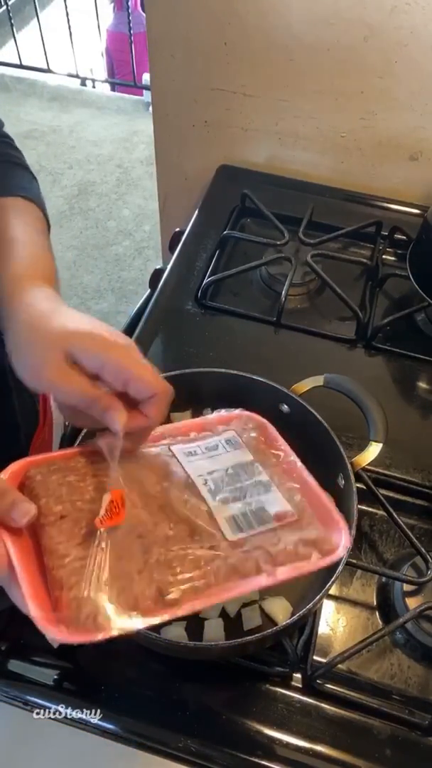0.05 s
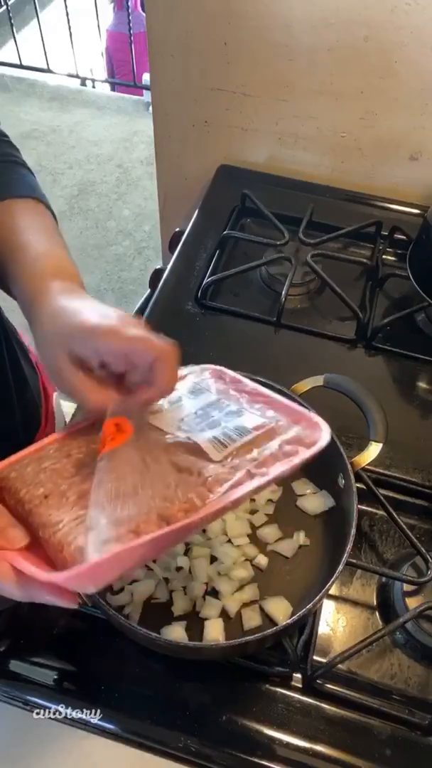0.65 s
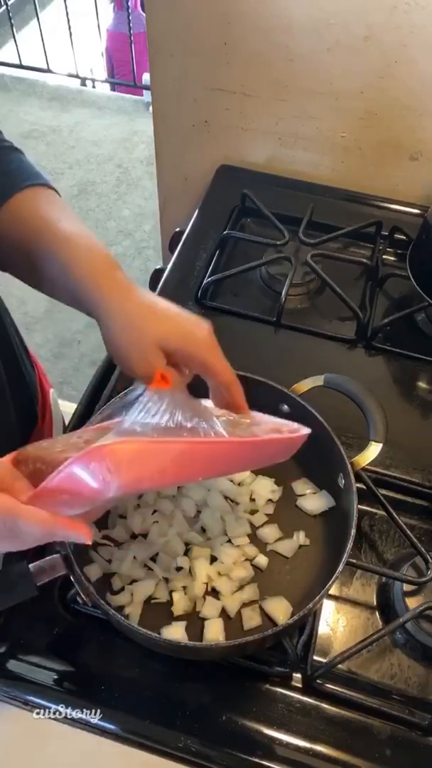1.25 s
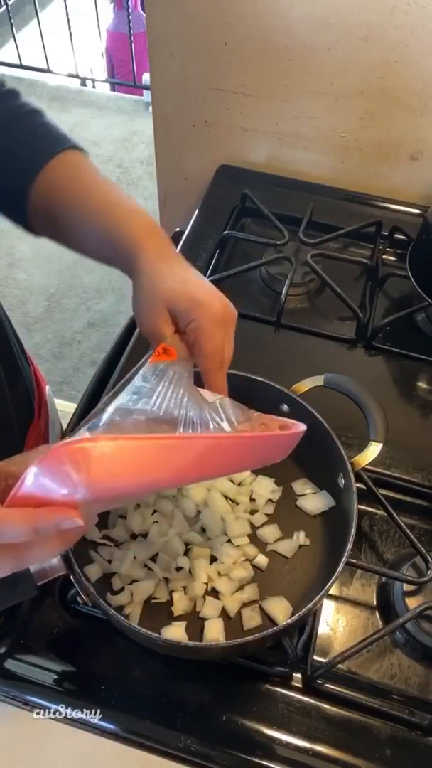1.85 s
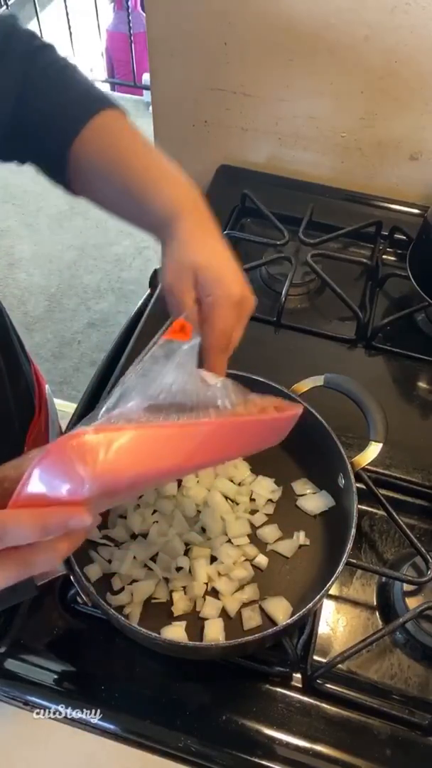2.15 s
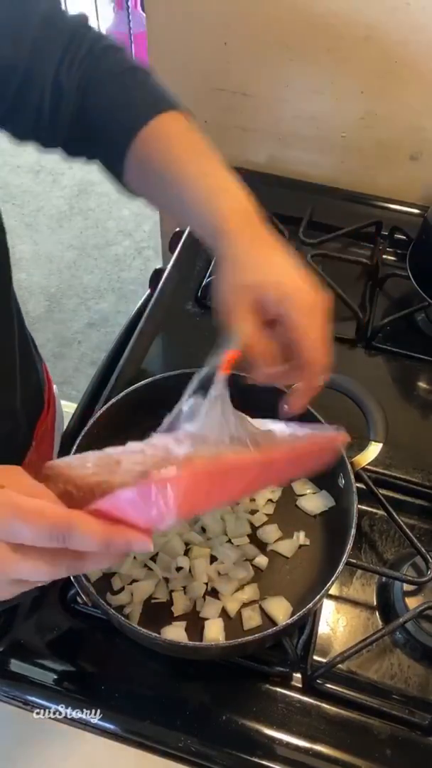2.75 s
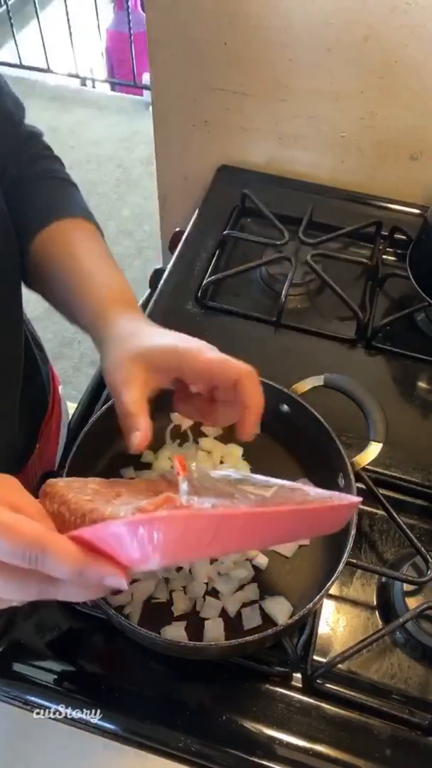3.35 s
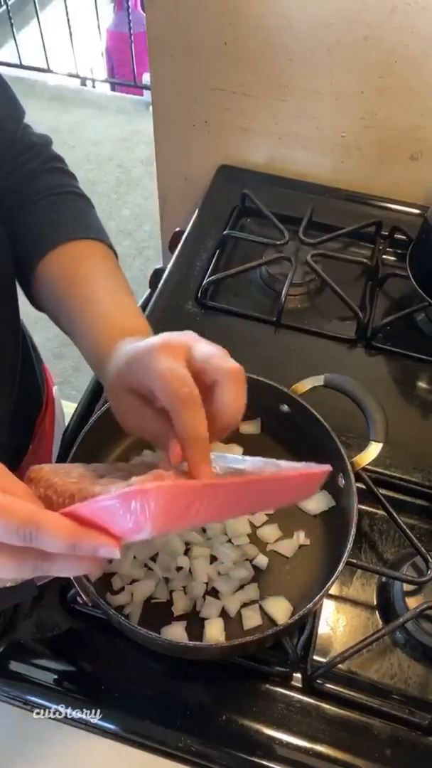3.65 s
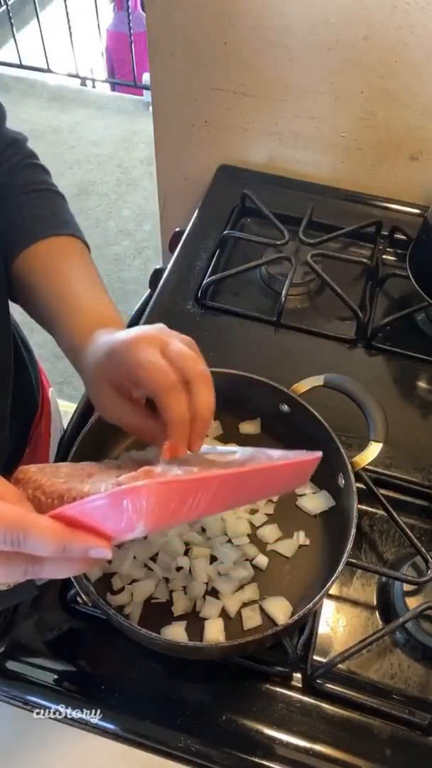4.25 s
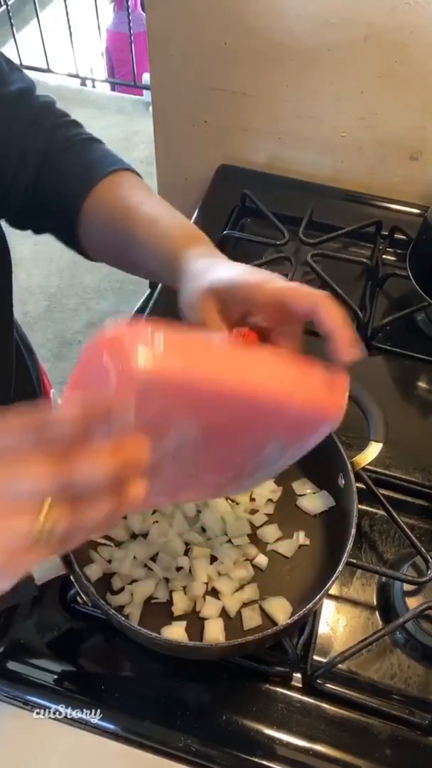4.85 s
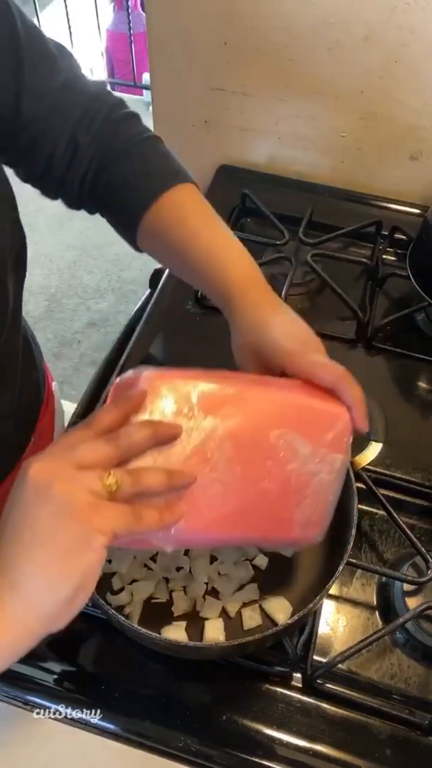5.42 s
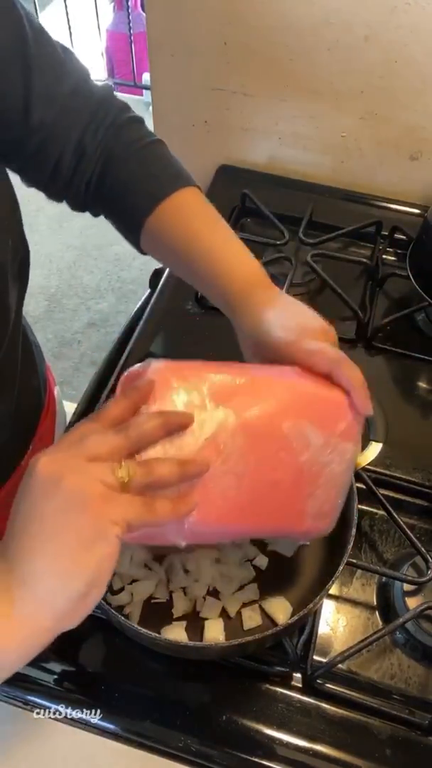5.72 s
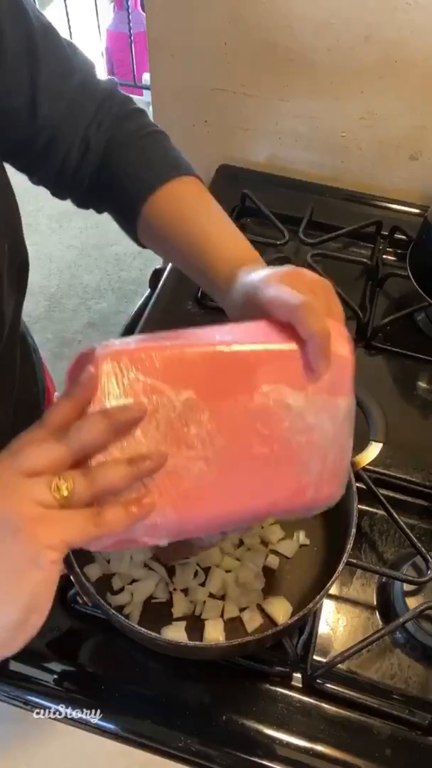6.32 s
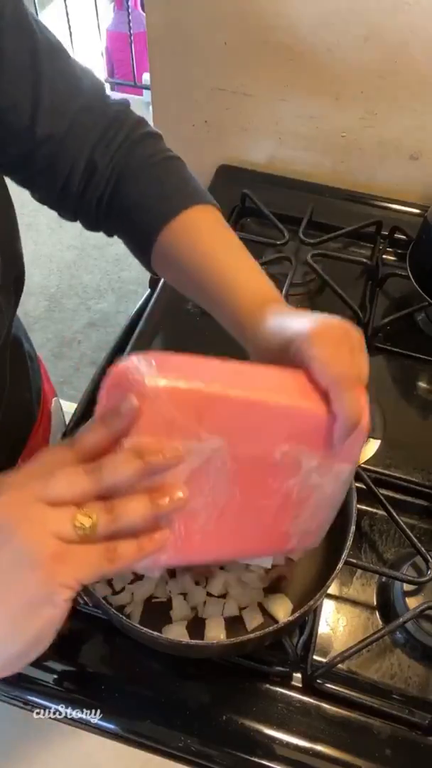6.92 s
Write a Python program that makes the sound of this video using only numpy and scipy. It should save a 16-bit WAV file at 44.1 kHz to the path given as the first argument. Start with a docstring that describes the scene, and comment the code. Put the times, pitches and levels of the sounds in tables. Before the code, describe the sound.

Diced onion sizzles in a pan while cling film snaps and rustles on a foam tray, then meat drops in and the sizzle swells.

```python
"""In a kitchen, diced onion sizzles in a pan on a gas stove, over the low hum of a motor.
The sizzle is thousands of tiny steam bubbles bursting; bigger drops of water pop in the oil.
Just above the pan, hands stretch and tear the cling film on a foam tray of minced meat:
the film snaps, rustles and squeaks, and fingers knock on the hollow tray.
The tray is turned over, the meat flops into the oil, and the sizzle swells and deepens."""
import sys
import numpy as np
from scipy import signal
from scipy.fft import rfft, irfft
from scipy.io import wavfile

SR = 44100
rng = np.random.default_rng(int(sys.argv[2]) if len(sys.argv) > 2 else 0)


def file_out(sig):
    """Save sig as 16-bit WAV at sys.argv[1]."""
    # one column per channel
    cols = np.atleast_2d(sig).T
    # limit, then scale
    lim = np.clip(cols, -1, 1)
    pcm = np.round(lim * 32767).astype(np.int16)
    wavfile.write(sys.argv[1], SR, pcm)


N = 316682
TIME = np.arange(N) / SR
HZ = np.fft.rfftfreq(4096, 1 / SR)  # the pitches at which every tone curve is given
GENTLE_DB = -34  # level of gentle frying

# pitches at which the air in the pan rings: pitch_hz, width_hz, boost_db
PAN_RESONANCES = [(1013, 86, 3), (1170, 92, 8.5), (1292, 82, 7.5), (1780, 470, 4.5), (2304, 195, 4.5),
                  (2850, 420, 3), (3510, 210, 1), (4300, 510, -1.5), (5630, 160, -0.5), (6400, 150, 0),
                  (7500, 130, 1.5), (8330, 250, 1)]


def sizzle(bubbling_offset_db=-10, bubbling_growth=0.055):
    """Bursting bubbles make fine fizz and coarser bubbling; the louder, the more they blur into hiss."""
    # tone of the fine fizz: pitch_hz, gain_db
    fizz_tone = [(200, -49), (900, -18), (2000, -9.5), (4000, -7.5), (6000, 1.5), (7500, 2.5), (9200, 4),
                 (9900, 1), (12300, 2.5), (14000, -3), (16000, -9.5)]
    # tone of the coarse bubbling: pitch_hz, gain_db
    bubbling_tone = [(100, -2), (300, -8), (800, -4.5), (1200, -5.5), (2500, -7), (3300, -2), (4400, 2),
                     (6000, -4.5), (10000, -20), (16000, -26)]
    fizz_db = frying_db()
    # the bubbling gains on the fizz as the frying grows, so the sound deepens
    bubbling_db = fizz_db + bubbling_offset_db + bubbling_growth * (fizz_db - GENTLE_DB)
    hiss_share = np.clip(0.47 + 0.016 * (fizz_db - GENTLE_DB), 0, 0.95)
    fine = bubbles(per_s=3000, spread_db=2.5, fade_s=0.043, direct=0.86, spots=16)
    fine = np.sqrt(1 - hiss_share) * fine + np.sqrt(hiss_share) * rng.standard_normal(N)
    coarse = bubbles(per_s=1200, spread_db=3.5, fade_s=0.029, direct=0.96, spots=12)
    coarse = np.sqrt(1 - hiss_share) * coarse + np.sqrt(hiss_share) * rng.standard_normal(N)
    surge = (1 - hiss_share) * drift(per_s=32)  # gentle frying comes in small waves
    pan_db = body_tone(PAN_RESONANCES)
    fizz = colour(fine * gain_of(fizz_db + 1.2 * surge), curve(fizz_tone) + pan_db)
    bubbling = colour(coarse * gain_of(bubbling_db + 0.72 * surge), curve(bubbling_tone) + pan_db)
    return fizz + bubbling


def bubbles(per_s, spread_db, fade_s, direct, spots):
    """Tiny steam bubbles burst at several spots in the pan, each spot with its own echoes."""
    bursts = [signal.oaconvolve(clicks(N, per_s / spots, spread_db), echoing_click(fade_s, direct))[:N]
              for _ in range(spots)]
    return unit_level(sum(bursts))


def frying_db():
    """Level over time of the onion and the meat frying together."""
    # the onion frying on its own: time_s, level_db
    onion_levels = [(0, -35), (1.3, -35), (1.68, -37.5), (2.0, -34), (2.85, -37), (3.1, -36.5),
                    (3.35, -35.5), (3.8, -37.5), (4.25, -38), (4.75, -35), (5.08, -38.5)]
    onion = gain_of(np.interp(TIME, *np.transpose(onion_levels)))
    return 20 * np.log10(np.hypot(onion, meat_flares()))


def meat_flares(trim_db=-0.27):
    """Strength of the frying meat over time: each touch of the oil swells, then settles."""
    # juice, then the edge, then the bulk of the meat meet the oil:
    # start_s, peak_s, level_db (before the trim), fade_s (time to fall by 60 dB)
    touches = [(5.14, 5.96, -30.8, 10), (6.43, 6.61, -29.4, 1.8), (6.74, 6.86, -27.1, 25)]
    swells = [gain_of(db + trim_db) * envelope(TIME - start, peak - start, peak - start, fade_s)
              for start, peak, db, fade_s in touches]
    return np.sqrt(np.sum(np.square(swells), axis=0))


def boil(offset_db=-9, power=2.34, lead_s=0.054, width_hz=300):
    """Water boils out of the meat as it heats, hissing in the pan just ahead of each flare."""
    # pitches at which the steam rings: pitch_hz, gain_db
    steam_peaks = [(1270, -2), (2330, -1.5), (2890, -5.5), (3330, 1.5), (4250, 0), (4480, -9), (5680, -9)]
    meat = np.interp(TIME + lead_s, TIME, meat_flares())
    strength = gain_of(offset_db) * meat.max() * (meat / meat.max()) ** power
    steam = strength * rng.standard_normal(N)
    ringing = sum(gain_of(db) / (1 + ((HZ - hz) / (width_hz / 2)) ** 2) for hz, db in steam_peaks)
    return colour(steam, 20 * np.log10(ringing))


def ticks(sharp_boost_db=6, droplets_db=-45.8, droplets_growth=0.5):
    """Sharp ticks stand out over the faint ticking of flying droplets, which grows with the frying."""
    # drops popping in the oil and a few crackles of the film: start_s, level_db (before the boost)
    sharp_ticks = [(0.0194, -16.5), (0.14, -10.5), (0.64, -20), (0.655, -11.5), (0.8403, -19), (1.077, -12),
                   (1.19, -11.5), (1.278, -16), (1.3125, -9.5), (1.372, -10.5), (1.454, -25), (1.6344, -20),
                   (1.867, -17), (1.929, -16), (2.593, -16.5), (2.79, -12.5), (3.028, -15.5),
                   (4.5835, -14.5), (4.7846, -14), (4.904, -16.5), (5.1202, -17), (5.9035, -13),
                   (5.9678, -9.5), (6.3373, -8.5), (6.6022, -9)]
    # tone of all the ticks: pitch_hz, gain_db
    tick_tone = [(300, -11), (1200, -13.5), (3000, -3.5), (6000, 2), (9000, 7.5), (12500, -2.5),
                 (16000, -18)]
    droplets = bubbles(per_s=40, spread_db=1.5, fade_s=0.048, direct=1.1, spots=4)
    out = gain_of(droplets_db + droplets_growth * (frying_db() - GENTLE_DB)) * droplets
    for start, db in sharp_ticks:
        add(out, start, gain_of(db + sharp_boost_db) * echoing_click(fade_s=0.04, direct=0.7))
    return colour(out, curve(tick_tone) + body_tone(PAN_RESONANCES))


def film_snaps(boost_db=21):
    """Tight film gives way with a crack that bounces off the tray, jolts it and shakes the loose film."""
    # the cracks: start_s, level_db (before the boost), pitch_hz, steepness (1 bright crack, 2 dull pluck)
    snaps = [(0.169, -35, 3500, 1.3), (.800, -26.5, 2800, 1.2), (1.045, -29.5, 1400, 2.1),
             (1.0861, -35, 1150, 2), (1.247, -34, 1500, 0.6), (1.372, -32.5, 1800, 1.4),
             (1.397, -37.5, 1400, 1.0), (1.514, -31.5, 1900, 2.1), (1.633, -37.5, 2200, 0.69),
             (1.8157, -23.5, 3480, 0.97), (2.2401, -13, 4430, 1.16), (4.64, -31, 2200, 0.81),
             (4.923, -30, 2500, 0.7), (5.18, -37.5, 2300, 1.6)]
    light_db, light_fade_s, doubling_db = -37, 0.028, 38  # tighter film snaps louder and rings longer
    bounce_s, bounce_db, jolt_db, jolt_hz = 0.00075, -8, -9, 650
    shiver_db, shiver_hz = -24, 342
    out = np.zeros(N)
    for start, db, hz, steep in snaps:
        fade_s = light_fade_s * 2 ** ((db - light_db) / doubling_db)
        crack = colour(echoing_click(fade_s, direct=0.45), hump(hz, 0.86, steep) + tray_tone())
        jolt_tone = hump(jolt_hz, narrow=0.9, steep=0.9) + tray_tone()
        jolt = colour(echoing_click(fade_s=0.034, direct=0.32), jolt_tone)
        strength = gain_of(db + boost_db)
        add(out, start, strength * crack)
        add(out, start + bounce_s, strength * (gain_of(bounce_db) * crack + gain_of(jolt_db) * jolt))
    shivers = [(start, 0.01, db + shiver_db, shiver_hz) for start, db, *_ in snaps]
    return out + rubs(shivers, tray_tone(), rise_s=0.011, fade_s=0.28,
                      narrow=0.25, steep=1.27, per_s=900, spread_db=1.5)


def film_rustles():
    """The film is dragged and crumpled against the tray."""
    # each drag: start_s, hold_s, level_db, pitch_hz
    drags = [(.13, 0.02, -43, 503), (.322, 0.019, -39, 746), (.455, 0.032, -34, 1610),
             (.585, 0.25, -40, 785), (.812, 0.036, -37.5, 1710), (1.04, 0.067, -42.5, 1150),
             (1.17, 0.12, -49, 850), (1.48, 0.0089, -47.5, 480), (1.768, 0.011, -45.5, 420),
             (1.825, 0.1, -46.5, 580), (2.24, 0.014, -46.5, 360), (2.335, 0.037, -48, 420),
             (2.69, 0.012, -42.5, 1550), (3.172, 0.048, -37, 555), (3.354, 0.011, -32, 3200),
             (4.31, 0.038, -50.5, 420), (4.63, 0.018, -46, 504), (4.742, 0.014, -41, 614),
             (4.84, 0.11, -47, 1100)]
    return rubs(drags, tray_tone(), rise_s=0.0082, fade_s=0.27,
                narrow=0.81, steep=0.64, per_s=1700, spread_db=0)


def film_squeaks(rise_s=0.0021, fade_s=0.07, width_hz=600):
    """The film sticks and slips over fingers and foam; its pitch slides as its tension changes."""
    # each squeak: start_s, hold_s, level_db, start_hz, end_hz
    squeaks = [(.815, .025, -42, 2100, 1800), (1.05, .062, -40.5, 1150, 1130),
               (1.195, .08, -46, 1130, 1200), (3.163, .04, -38.5, 1000, 850), (3.358, .02, -39, 1700, 2200),
               (3.542, .04, -47.5, 1000, 1550), (5.528, .007, -40.5, 1900, 2350),
               (5.831, .004, -42, 1400, 1650), (6.512, .012, -35.5, 2130, 2180)]
    out, t = np.zeros(N), np.arange(16000) / SR
    lowpass = signal.butter(2, width_hz / 2, fs=SR, output="sos")
    for start, hold, db, start_hz, end_hz in squeaks:
        pitch_hz = np.interp(t, [0, hold], [start_hz, end_hz])
        tone = np.exp(2j * np.pi * np.cumsum(pitch_hz) / SR)
        # keep only the band of noise around the sliding pitch
        slips = (signal.sosfilt(lowpass, rng.standard_normal(len(t)) / tone) * tone).real
        add(out, start, gain_of(db) * envelope(t, rise_s, hold, fade_s) * unit_level(slips))
    return out


def finger_knocks(narrow=1.1, contact_s=0.0005):
    """A finger knocks on the tray and rings mostly the notes near the pitch of the blow."""
    # each knock: start_s, peak_db, pitch_hz (low for a soft fingertip, high for a nail)
    knocks = [(0.133, -31, 300), (.326, -30, 700), (0.4469, -23.5, 520), (1.817, -22.5, 620),
              (4.9243, -24.5, 1250), (4.9992, -27.5, 1350), (5.21, -22.5, 900), (6.517, -23.5, 1090)]
    # the tray's own notes: pitch_hz, gain_db, fade_s
    tray_notes = [(440, -2, 0.032), (1054, 2.5, 0.012), (1285, -2, 0.036), (1840, -5, 0.014),
                  (2560, 12, 0.0065)]
    out, t = np.zeros(N), np.arange(6000) / SR
    for start, db, blow_hz in knocks:
        ring = np.zeros(len(t))
        for k, (hz, note_db, fade_s) in enumerate(tray_notes):
            note = gain_of(note_db - 60 * t / fade_s) * np.sin(2 * np.pi * hz * t)
            mismatch = np.hypot(1, narrow * (hz / blow_hz - blow_hz / hz))
            ring += (-1) ** k * note / mismatch
        ring *= 1 - np.exp(-t / contact_s)  # the fingertip sinks into the foam
        add(out, start, gain_of(db) * ring / abs(ring).max())
    return out


def tray_tone(bass_cut_hz=300):
    """Tone curve in dB of the light foam tray, which rings hollow and gives off little bass."""
    # pitches at which the tray rings: pitch_hz, width_hz, boost_db
    resonances = [(347, 60, 3.5), (436, 126, 5.5), (600, 60, 3), (800, 88, 1.5), (985, 35, 5),
                  (1290, 50, 4.5), (1920, 290, 3.5), (3930, 870, 1)]
    return body_tone(resonances) - 10 * np.log10(1 + (bass_cut_hz / (HZ + 10)) ** 4)


def meat_squelches():
    """Wet mince peels off the tray and slides over the onion."""
    # each squelch: start_s, hold_s, level_db, pitch_hz
    squelches = [(5.94, 0.095, -45.5, 507), (6.235, 0.033, -46.5, 243), (6.4, 0.073, -46.5, 520),
                 (6.56, 0.19, -42.5, 382), (6.82, 0.027, -37.5, 700)]
    return rubs(squelches, body_tone(PAN_RESONANCES), rise_s=0.0048, fade_s=0.4,
                narrow=1.0, steep=0.88, per_s=840, spread_db=0.5)


def meat_slaps():
    """Lumps of meat land with a short wet slap."""
    # each landing: start_s, hold_s, level_db, pitch_hz
    slaps = [(6.62, 0.028, -36.5, 915), (6.701, 0.019, -38, 1030), (6.751, 0.012, -36, 990),
             (6.823, .012, -49, 1100)]
    return rubs(slaps, body_db=0, rise_s=0.003, fade_s=0.06,
                narrow=1.8, steep=1.3, per_s=1500, spread_db=1.5)


def thuds(sag=0.32, roughness=1.2):
    """The tray and the falling meat bump softly: a few uneven low swings that sink in pitch."""
    # each bump: start_s, length_s, level_db, middle_pitch_hz
    bumps = [(.115, 0.062, -53, 184), (2.234, 0.025, -39.5, 173), (3.177, 0.076, -42.5, 169),
             (4.303, 0.085, -40, 147), (4.321, 0.11, -32.5, 51), (4.72, .06, -47, 98),
             (5.011, 0.075, -41, 153), (5.439, 0.0384, -41, 67), (6.678, 0.2, -39, 74),
             (6.741, 0.08, -35.5, 143.5)]
    out = np.zeros(N)
    for start, length, db, hz in bumps:
        t = np.arange(round(length * SR)) / SR
        rumble = colour(rng.standard_normal(SR), hump(hz, narrow=1.2, steep=1.72))[-len(t):]
        swing = np.sin(2 * np.pi * hz * t * (1 + sag * (1 - t / length) / 2))
        bump = unit_level(swing + roughness * unit_level(rumble))
        add(out, start, gain_of(db) * signal.windows.tukey(len(t), 0.7) * bump)
    return signal.sosfilt(signal.butter(4, [34, 225], "bandpass", fs=SR, output="sos"), out)


def kitchen_echo(sound, gap_s=0.006):
    """The kitchen answers with a short wash of echoes whose treble dies first."""
    # how long the room rings: pitch_hz, fade_s
    room_fades = [(150, 0.76), (600, 0.38), (2500, 0.21), (8000, 0.21), (16000, 0.19)]
    noise = rng.standard_normal(SR // 2)
    noise[:round(gap_s * SR)] = 0
    hz, t, bands = signal.stft(noise, SR, nperseg=256)
    fading = np.exp(-np.log(1000) * t / curve(room_fades, hz)[:, None])
    tail = signal.istft(bands * fading, SR, nperseg=256)[1]
    return signal.fftconvolve(sound, tail / np.linalg.norm(tail))[:N]


def motor_hum(pitch_hz=58.96, level_db=-44, octave_db=-65):
    """A motor hums just under the frequency of the mains power, wavering a little in level."""
    phase = 2 * np.pi * pitch_hz * TIME
    waver_db = 0.35 * drift(per_s=1.1)
    hum = gain_of(level_db + waver_db) * np.sin(phase) + gain_of(octave_db) * np.sin(2 * phase)
    return np.sqrt(2) * hum


def burner_rumble(level_db=-56.5):
    """The gas burner and the room give a soft, steady rumble."""
    # tone of the rumble: pitch_hz, gain_db
    rumble_tone = [(20, -23), (45, 9.5), (75, 6.5), (100, -3), (145, -3.5), (230, -12.5), (450, -10),
                   (1000, -14), (4000, -39)]
    return gain_of(level_db) * colour(rng.standard_normal(N), curve(rumble_tone))


def rubs(rows, body_db, rise_s, fade_s, narrow, steep, per_s, spread_db):
    """Each rub is a run of tiny slips around one pitch that swells, holds and dies away."""
    out, t = np.zeros(N), np.arange(40000) / SR
    for start, hold, db, hz in rows:
        slips = colour(clicks(len(t), per_s, spread_db), hump(hz, narrow, steep) + body_db)
        add(out, start, gain_of(db) * envelope(t, rise_s, hold, fade_s) * unit_level(slips))
    return out


def clicks(size, per_s, spread_db):
    """Clicks at random times; more spread makes a few stand out from the many small ones."""
    height = gain_of(spread_db * np.minimum(rng.exponential(1, size), 5))
    return unit_level(height * rng.choice([-1, 1], size) * (rng.random(size) < per_s / SR))


def echoing_click(fade_s, direct, size=4096):
    """A click and its quick echoes off pan, stove and tray; direct weighs the click against them."""
    t = np.arange(size) / SR
    burst = rng.choice([-1, 1], size) * rng.uniform(0.11, 1, size) * np.exp(-np.log(1000) * t / fade_s)
    burst /= np.linalg.norm(burst)
    burst[0] = direct
    return burst / np.linalg.norm(burst)


def drift(per_s):
    """A smooth random wobble; per_s sets how fast it moves."""
    slow = np.exp(-(np.fft.rfftfreq(N, 1 / SR) / per_s) ** 2)
    return unit_level(irfft(rfft(rng.standard_normal(N)) * slow, N))


def envelope(t, rise_s, hold_s, fade_s):
    """Rises from t = 0, holds until hold_s, then falls by 60 dB every fade_s."""
    return np.clip(t / rise_s, 0, 1) * np.exp(-np.log(1000) * np.maximum(t - hold_s, 0) / fade_s)


def colour(sound, tone_db):
    """Filters a sound with a tone curve, scaled so that white noise would keep its level."""
    log_gain = np.log(gain_of(np.r_[tone_db, tone_db[-2:0:-1]]))
    response = np.exp(np.conj(signal.hilbert(log_gain)))  # rings after a click, never before it
    taps = np.fft.ifft(response).real[:len(HZ)]
    return signal.fftconvolve(sound, taps / np.linalg.norm(taps))[:len(sound)]


def body_tone(resonances):
    """Tone curve in dB that a hollow body gives to all that sounds in it."""
    return sum(db * np.exp(-2 * ((HZ - hz) / width) ** 2) for hz, width, db in resonances)


def hump(hz, narrow, steep):
    """Tone curve in dB with one broad peak near hz."""
    ratio = (HZ + 10) / hz
    return -10 * steep * np.log10(1 + (narrow * (ratio - 1 / ratio)) ** 2)


def curve(points, hz=HZ):
    """Joins (pitch_hz, value) points with straight lines on an octave scale."""
    pitches, values = np.transpose(points)
    return np.interp(np.log(hz + 1), np.log(pitches + 1), values)


def gain_of(db):
    """Turns decibels into a factor to multiply by."""
    return 10 ** (np.asarray(db) / 20)


def unit_level(sound):
    """Scales a sound to an average (rms) level of 1."""
    return sound / np.sqrt(np.mean(sound ** 2) + 1e-20)


def add(mix, start_s, sound):
    """Adds a sound into the mix at start_s."""
    part = mix[max(round(start_s * SR), 0):][:len(sound)]
    part += sound[:len(part)]


def scene():
    """Pan and hands close by, the kitchen behind them; the same in both ears."""
    pan = sizzle() + boil() + ticks()
    film = film_rustles() + film_snaps() + film_squeaks()
    fingers = finger_knocks()
    meat = meat_squelches() + meat_slaps()
    room = kitchen_echo(gain_of(-13.5) * pan + gain_of(-11) * (film + meat) + gain_of(-18) * fingers)
    mix = pan + film + fingers + meat + thuds() + room + motor_hum() + burner_rumble()
    return np.tile(mix, (2, 1))


def record(dry):
    """Cuts off the very highest treble."""
    lowpass = signal.firwin(511, cutoff=15850, window=("kaiser", 9), fs=SR)
    return signal.oaconvolve(dry, lowpass[None], "same")


dry = scene()
out = record(dry)
file_out(out)
```